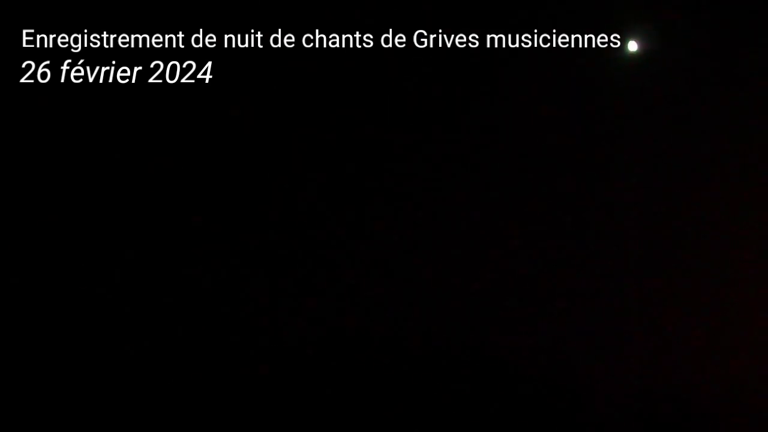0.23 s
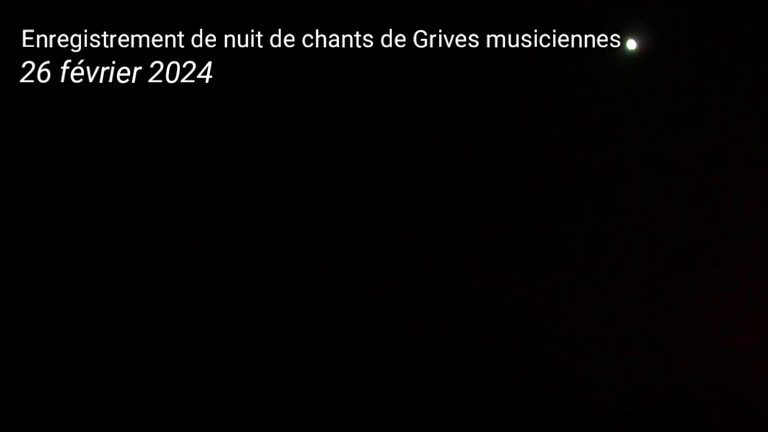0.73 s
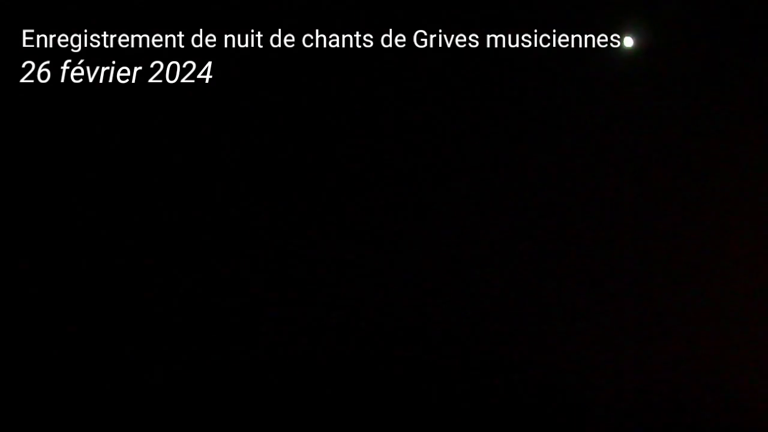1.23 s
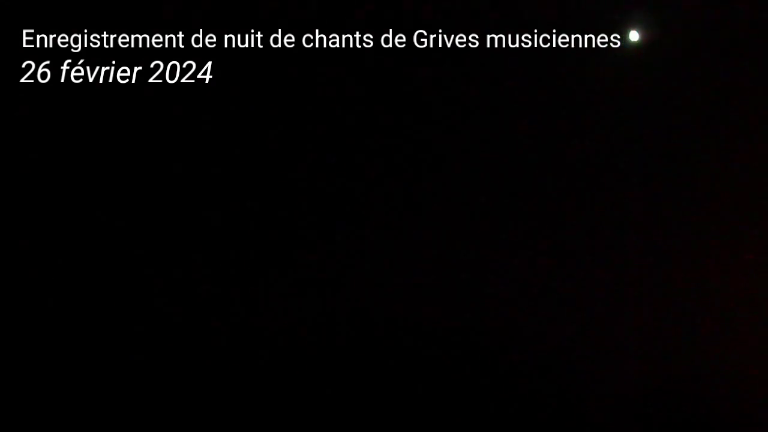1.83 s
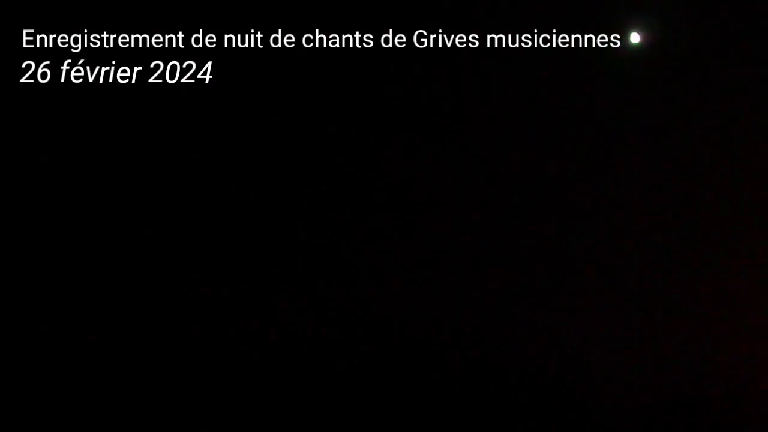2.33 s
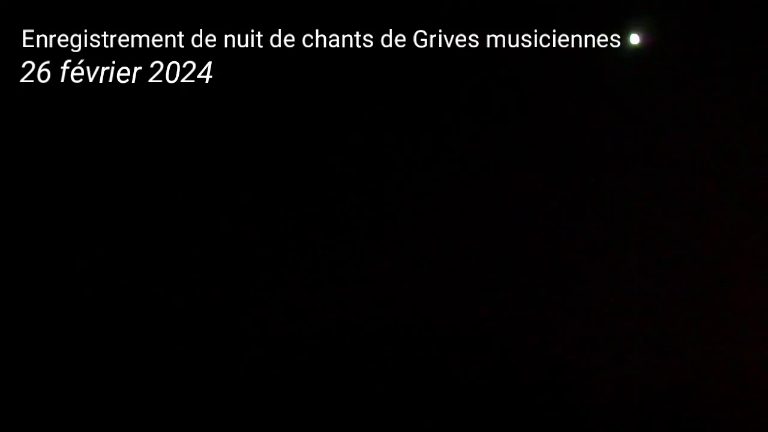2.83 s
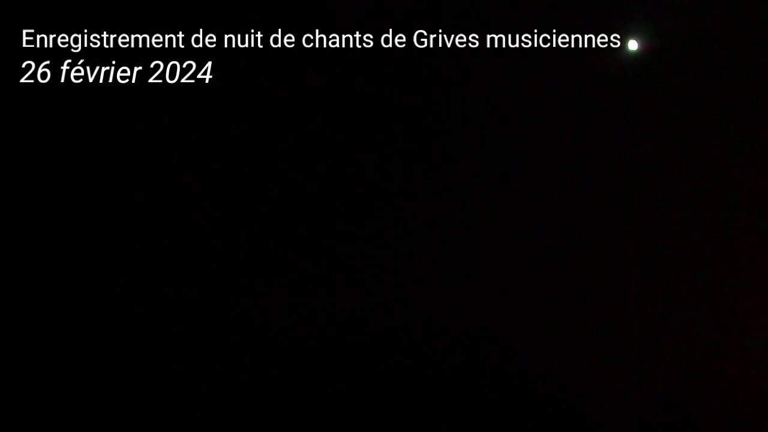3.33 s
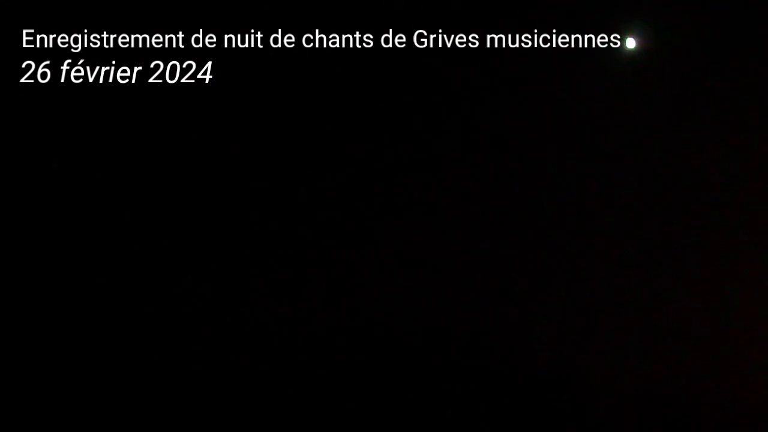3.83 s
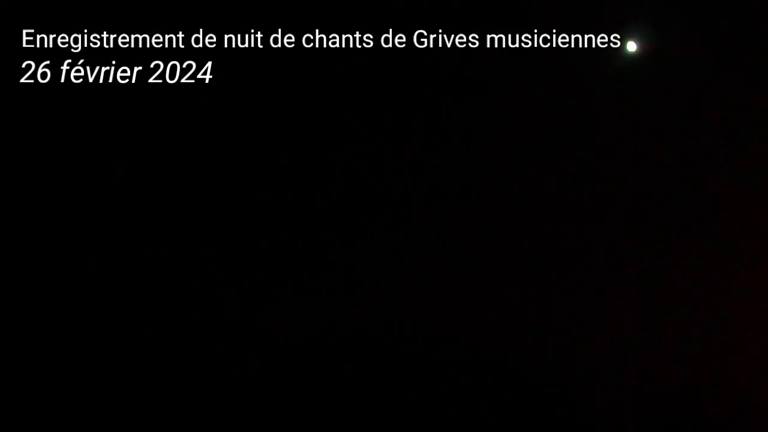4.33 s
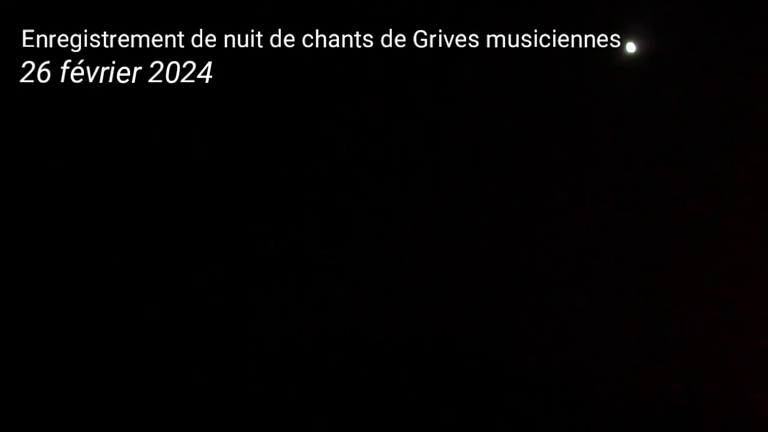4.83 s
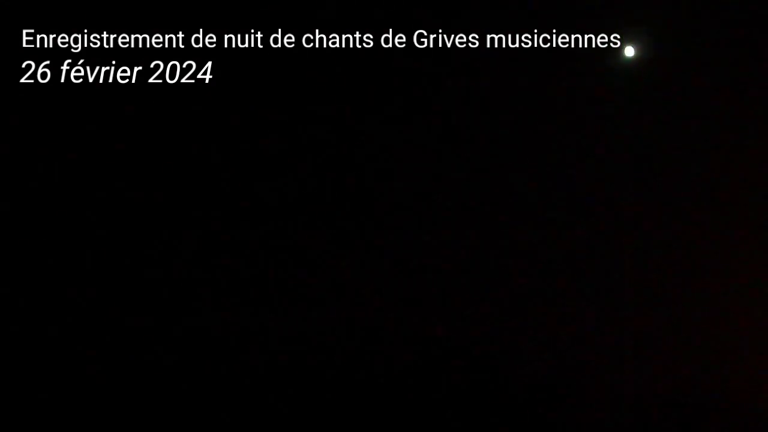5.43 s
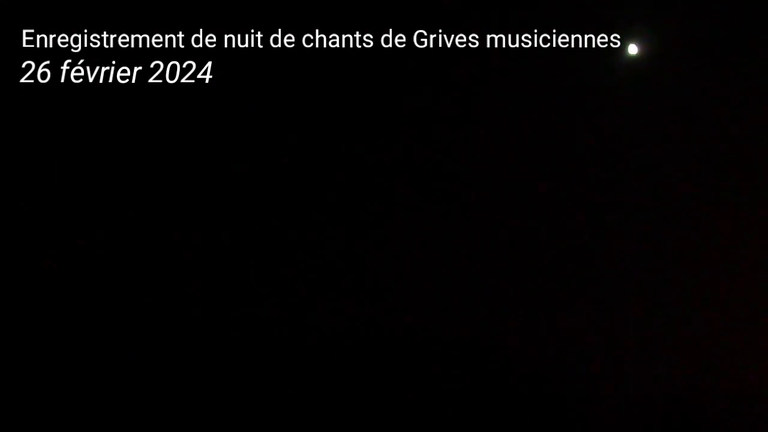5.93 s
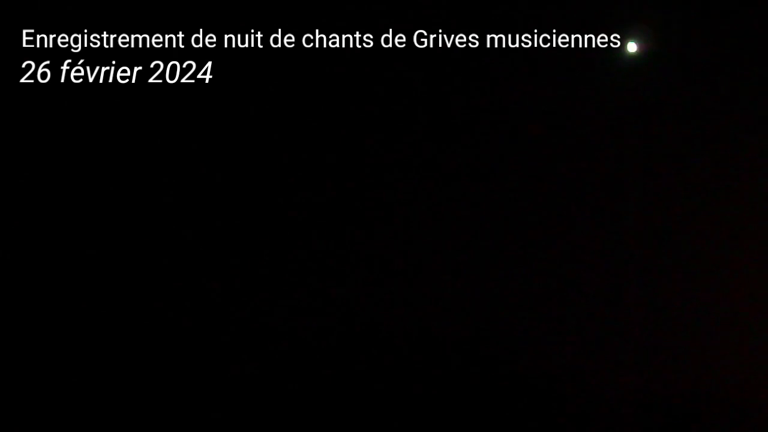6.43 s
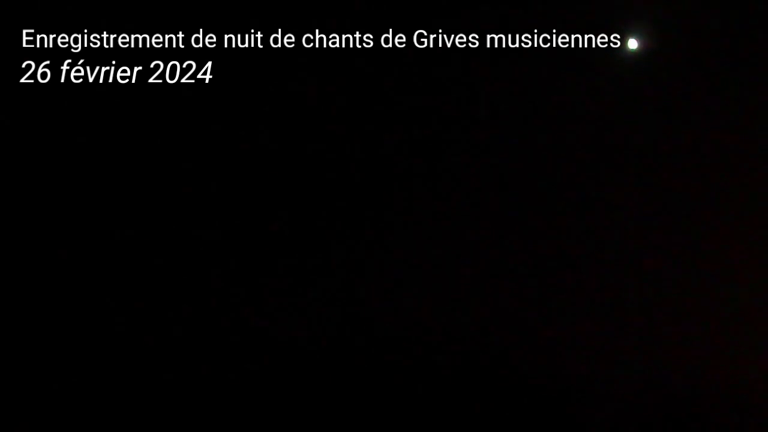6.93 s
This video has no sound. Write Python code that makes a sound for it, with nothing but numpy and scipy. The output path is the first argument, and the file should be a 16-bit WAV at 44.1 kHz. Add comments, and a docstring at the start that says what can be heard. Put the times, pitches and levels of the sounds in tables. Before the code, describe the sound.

A thrush repeats a short fluted phrase in the night while others twitter and chirp, with one close snap and a faint steady whine.

```python
"""A song thrush's fluted phrase at night, some way off, over a far murmur, mains hum and a thin whine.
The phrase comes back while other thrushes warble, trill, twitter and chirp, each note a whistled tone
from the syrinx; trees and walls echo them and the faint birds farther out. Once, close to the
microphone, something snaps. Heard in mono on a small recorder that cuts the highest treble."""
import sys
import numpy as np
from scipy import signal
from scipy.fft import rfft, irfft
from scipy.io import wavfile
from scipy.ndimage import uniform_filter1d

SR = 44100
rng = np.random.default_rng(int(sys.argv[2]) if len(sys.argv) > 2 else 0)


def master_out(mix):
    """Clip the mix to full scale and print it as 16-bit PCM to the path in sys.argv[1]."""
    frames = np.transpose(np.atleast_2d(mix))
    ceiling = np.clip(frames, -1, 1)
    pcm = np.round(ceiling * 32767).astype(np.int16)
    wavfile.write(sys.argv[1], SR, pcm)


N = 316638
RASP_HZ = 58  # how far quick notes stray from their pitch


def undb(db):
    """Decibels to gain."""
    return 10 ** (np.asarray(db) / 20)


def decay(t, t60_s):
    """An envelope that falls 60 dB in t60_s."""
    return np.exp(-np.log(1000) * t / t60_s)


def whistle(out, start_s, hz, db, waver_hz, overtone_db=-40, flutter_db=4.0, fade_ms=1.9):
    """One slightly unsteady tone from the syrinx, with two overtones; longer notes fade more gently."""
    k = np.arange(len(hz))
    fade_samples = fade_ms * SR / 1000 + .05 * min(len(k), SR // 10)
    fade = np.clip(np.minimum(k, k[::-1]) / fade_samples, 0, 1)
    waver, flutter = [np.interp(k, np.arange(80) * SR / 200, v) for v in rng.standard_normal((2, 80))]
    phase = 2 * np.pi * np.cumsum(hz + waver_hz * waver) / SR
    tone = np.sin(phase) + undb(overtone_db) * np.sin(2 * phase)
    tone += undb(1.35 * overtone_db) * np.sin(3 * phase)
    note = np.sqrt(2) * undb(db + flutter_db * flutter) * fade * tone
    first = max(int(start_s * SR), 0)
    out[first:first + len(note)] += note[:N - first]


def glide(out, strand, start_s=0, stretch=1, db=0, overtones_db=(-40, -40), ratio=1,
          round_ms=7.7, waver_hz=28.0):
    """A whistle along points of time_s, pitch_hz, level_db; the syrinx rounds the corners."""
    times, hz, levels = np.transpose(strand)
    t = np.arange(times[0], times[-1], 1 / SR / stretch)
    pitch = ratio * uniform_filter1d(np.interp(t, times, hz), int(round_ms * SR / 1000), mode="nearest")
    level = db + np.interp(t, times, levels)
    whistle(out, start_s + times[0] * stretch, pitch, level, waver_hz, np.linspace(*overtones_db, len(t)))


def chirp(out, start_s, ms, first_hz, last_hz, db, fade_db=0, least_rasp_hz=0):
    """A straight, slightly raspy sweep; notes longer than 25 ms hold their pitch better."""
    along = np.linspace(0, 1, int(ms * SR / 1000))
    rasp_hz = max(least_rasp_hz, RASP_HZ * min(1, 25 / ms))
    whistle(out, start_s, first_hz + (last_hz - first_hz) * along, db + fade_db * along, rasp_hz)


def swung_note(out, start_s, ms, first_hz, last_hz, swing_hz, rate_hz, db, power, spike_db, swell_db=0):
    """A whistle whose pitch spikes up quickly and sinks back, loudest near the resting pitch."""
    t = np.arange(0, ms / 1000, 1 / SR)
    saw = (1 + signal.sawtooth(2 * np.pi * rate_hz * t + 1, width=.2)) / 2
    stroke = uniform_filter1d(2 * saw ** power - .5, size=SR // 1000)
    pitch = np.linspace(first_hz, last_hz, len(t)) + swing_hz * stroke
    level = db + spike_db * np.abs(stroke) - swell_db * (1 - t / t[-1])
    whistle(out, start_s, pitch, level, RASP_HZ)


def night_murmur():
    """Steady noise: the far murmur in the bass, microphone hiss in the treble."""
    # spectrum of the background: frequency_hz, density_db_per_hz
    spectrum = [(28, -71.5), (40, -75), (52, -68.5), (70, -80.5), (110, -81.5), (680, -84.5), (1400, -94),
                (2600, -95), (6500, -99), (9000, -93.5), (11200, -86), (15600, -110)]
    hz, db = np.transpose(spectrum)
    log_hz = np.log(np.arange(N // 2 + 1) * SR / N + 1)
    gain = undb(np.interp(log_hz, np.log(hz), db)) * np.sqrt(SR / 2)
    return irfft(rfft(rng.standard_normal(N)) * gain, N)


def electrics(whine_hz=9560.2, flips_per_s=72.422, whine_db=-41.5, hum_hz=50, hum_db=-51.5):
    """A thin high tone whose sign flips at a steady rate, and mains hum."""
    t = np.arange(N) / SR
    sign = signal.square(np.pi * flips_per_s * (t - .011))
    whine = undb(whine_db) * sign * np.sin(2 * np.pi * whine_hz * t)
    # the circuit passes only a band, which softens the click of each flip
    whine = signal.sosfilt(signal.butter(1, [6500, 12500], "bandpass", fs=SR, output="sos"), whine)
    hum = undb(hum_db) * np.sin(2 * np.pi * hum_hz * t)
    return np.sqrt(2) * (whine + hum)


def chirps(out):
    """Straight sweeps and held whistles scattered through the song."""
    # single notes: start_s, length_ms, first_hz, last_hz, level_db
    notes = [(0.002, 43, 6770, 5200, -54.5), (0.045, 44, 6120, 7260, -51), (0.082, 45, 6700, 5800, -46.5),
             (0.688, 28, 3900, 4650, -51), (0.692, 20, 4270, 5330, -53), (0.716, 13, 3150, 5050, -42.5),
             (0.733, 13, 5200, 2790, -39.5), (0.748, 30, 3610, 2770, -42), (2.137, 28, 4180, 4000, -27),
             (2.237, 12.4, 5110, 3320, -35.5), (2.247, 4.6, 3300, 4100, -36), (2.265, 6.7, 3930, 4800, -37),
             (2.298, 16.4, 4560, 3670, -38), (2.328, 16, 4500, 3300, -46), (2.919, 12, 3750, 3820, -50),
             (2.941, 31.6, 3920, 4370, -34.5), (3.201, 7.2, 4800, 3820, -35), (3.435, 35, 4280, 4080, -43),
             (3.525, 19, 4076, 4340, -39), (3.62, 12.2, 3550, 3800, -33.5),
             (3.697, 27.5, 3750, 4254, -40.5), (3.763, 11, 3960, 3380, -43.5),
             (4.306, 52, 3254, 3730, -36.5), (4.348, 86, 2762, 2624, -36), (4.524, 18, 4160, 3400, -35),
             (4.558, 12, 3766, 3280, -28), (4.574, 53, 4580, 3240, -42), (4.62, 21, 4930, 3140, -34.5),
             (4.798, 91, 2703, 2750, -34), (4.892, 11.7, 3170, 2550, -32.5), (5.728, 21, 3240, 4080, -43.5),
             (6.982, 12.5, 6410, 5150, -55)]
    for note in notes:
        chirp(out, *note)


def echoes(song, low_t60_s=.97, high_t60_s=.35, near_t60_s=.088, high_db=5, near_db=-5.5, far_db=-7):
    """Quick scatter from near branches, then a long tail off trees and walls that loses treble first."""
    t = np.arange(int(1.5 * SR)) / SR
    far_noise, near_noise = rng.standard_normal((2, len(t)))
    low = signal.sosfilt(signal.butter(2, 4000, fs=SR, output="sos"), far_noise)
    high = undb(high_db) * (far_noise - low)
    tail = (low * decay(t, low_t60_s) + high * decay(t, high_t60_s)) * (1 - np.exp(-t / .0086))
    scatter = near_noise * decay(t, near_t60_s) * (1 - np.exp(-t / .00049))
    # energy of a decaying noise is t60 SR / (2 ln 1000)
    scale = np.sqrt(2 * np.log(1000) / SR)
    response = scale * (undb(far_db) * tail + undb(near_db) * scatter / np.sqrt(near_t60_s))
    return signal.fftconvolve(song, response)[:N]


def fluted_phrase(out):
    """One thrush repeats a phrase of three overlapping whistled strands from two voices, with three faint
    strands at the sum and difference pitches where those voices meet."""
    # the phrase, one list a strand: time_s, pitch_hz, level_db
    strands = [
        [(0, 1970, -51), (.025, 2350, -38), (.05, 2450, -32)],
        [(.022, 2820, -35.5), (.035, 3300, -42.5), (.05, 3000, -35.5), (.085, 2950, -32), (.105, 2950, -32),
         (.13, 2950, -38.5)],
        [(.106, 2370, -38.5), (.14, 2440, -32.5), (.185, 2431, -30), (.23, 2670, -30), (.27, 2840, -30.5),
         (.3, 3204, -30), (.33, 3600, -30.5), (.345, 4220, -50)],
        [(.022, 5100, -44), (.036, 5700, -48.5), (.05, 5550, -47)],
        [(.106, 5500, -50), (.185, 5200, -53)],
        [(.104, 3520, -39), (.118, 3750, -47.5), (.17, 3140, -46)],
    ]
    # each strand's second harmonic against its fundamental: start_db, end_db
    overtones = [(-7, -23), (-35, -38), (-43, -31), (-40, -40), (-40, -40), (-40, -40)]
    # how far each strand strays from its pitch: waver_hz
    wavers = [28, 10, 21, 80, 68, 100]
    # each time it is sung: start_s, stretch, gain_db
    repeats = [(.15, 1, -.5), (3.8, .985, .5), (4.46, .962, 0), (5.285, 1, -1), (6.105, 1.01, -1.5)]
    for start_s, stretch, db in repeats:
        for strand, overtones_db, waver_hz in zip(strands, overtones, wavers):
            glide(out, strand, start_s, stretch, db, overtones_db, waver_hz=waver_hz)


def far_birds():
    """Faint whistles, smeared by distance, and high falling ticks."""
    # distant whistles: start_s, length_ms, first_hz, last_hz, level_db
    whistles = [(0.586, 38, 4140, 4090, -54), (1.25, 100, 6600, 6170, -56.5), (1.56, 50, 3980, 4130, -48),
                (1.688, 87, 4190, 4050, -47), (1.842, 92, 4200, 4040, -50.5), (2.039, 78, 3200, 3180, -59),
                (2.589, 71, 4030, 4010, -48.5), (2.774, 57, 4020, 3580, -48.5),
                (5.206, 20, 6940, 6860, -46), (5.235, 16, 7070, 6500, -48), (7.104, 68, 4400, 3840, -58.5)]
    # one far bird's ticks: start_s
    ticks = [5.04, 5.068, 5.188, 5.226, 5.266]
    out = np.zeros(N)
    for note in whistles:
        chirp(out, *note, least_rasp_hz=90)
    for start_s in ticks:
        chirp(out, start_s, ms=12, first_hz=6700, last_hz=4950, db=-46)
    return out


def chips(out, first_s=.937, gap_s=.0705, low_top_hz=3500, rasp_hz=200):
    """Faint two-voiced arches of pitch at an even pace, each closed by a low drop."""
    # the high voice of each chip: top_hz, lag_ms
    high_voices = [(5400, 4), (5900, -2), (4400, 5), (4700, 11), (4030, 13)]
    sag = np.abs(np.linspace(-.75, 1, SR // 30)) ** 1.5
    for k, (top_hz, lag_ms) in enumerate(high_voices):
        start_s = first_s + k * gap_s
        whistle(out, start_s, low_top_hz * (1 - .408 * sag), db=-54.5, waver_hz=rasp_hz)
        whistle(out, start_s + lag_ms / 1000, top_hz * (1 - .39 * sag), db=-58.5, waver_hz=rasp_hz)
        chirp(out, start_s + .024, ms=14, first_hz=2350, last_hz=1950, db=-58.5, least_rasp_hz=rasp_hz)


def slurs(out):
    """Bending whistles, each sung once."""
    # one list a slur: time_s, pitch_hz, level_db
    strands = [
        [(1.42, 5200, -49), (1.437, 6300, -36.5), (1.448, 5860, -33), (1.465, 6660, -33.5),
         (1.485, 6750, -26.5), (1.502, 5870, -35)],
        [(1.398, 3880, -53), (1.448, 4120, -47), (1.462, 4750, -39), (1.49, 4900, -60)],
        [(5.745, 2770, -29), (5.757, 3070, -31), (5.79, 2235, -40.5), (5.805, 2147, -46), (5.83, 2630, -31.5),
         (5.855, 2550, -24.5)],
    ]
    for strand in strands:
        glide(out, strand)


def warbles(out):
    """A high two-voiced warble, three times in quick succession."""
    # the warble, one list a voice: time_s, pitch_hz, level_db
    voices = [
        [(0, 4930, -33), (.016, 7240, -31), (.034, 5760, -32.5), (.05, 5220, -41), (.066, 6480, -26),
         (.091, 5750, -30.5)],
        [(.018, 7400, -49), (.031, 8250, -42), (.051, 7000, -26.5), (.072, 8530, -38), (.1, 6650, -25),
         (.112, 7680, -28.5)],
    ]
    # each time it is sung: start_s, stretch, pitch_ratio, gain_db
    repeats = [(1.578, 0.99, 0.97, 0.5), (1.752, 0.98, 0.97, 0), (1.956, .99, 1.01, -2)]
    for start_s, stretch, ratio, db in repeats:
        for voice in voices:
            glide(out, voice, start_s, stretch, db, ratio=ratio, round_ms=5.3)


def trills(out, swing_hz=380):
    """Swelling notes with spiky swings of pitch, each closed by a thin falling squeak."""
    # trilled notes: start_s, length_ms, first_hz, last_hz, swings_per_s, level_db
    notes = [(2.161, 43, 4330, 4064, 58, -27.5), (4.068, 74, 4200, 4480, 60, -25.5),
             (4.179, 50, 4300, 4210, 76, -21.5), (4.295, 46, 4260, 4390, 55, -27),
             (4.4, 56, 4240, 4270, 74, -26.5)]
    for start_s, ms, first_hz, last_hz, rate_hz, db in notes:
        swung_note(out, start_s, ms, first_hz, last_hz, swing_hz, rate_hz, db,
                   power=3.2, spike_db=-5, swell_db=4)
        squeak_s = start_s + (ms - 6) / 1000
        chirp(out, squeak_s, ms=12, first_hz=7500, last_hz=5300, db=db - 29)


def tick_runs(out, slowing_ms=1.8, shrink=.75, step_db=-1.77):
    """Runs of rising ticks that slow, shrink and fade; each tick thins out towards its top."""
    # runs: start_s, tick_count, gap_ms, low_hz, first_top_hz, level_db
    runs = [(2.215, 6, 60, 3050, 4800, -28), (5.0, 5, 67.5, 2750, 3100, -35.5)]
    for start_s, count, gap_ms, low_hz, first_top_hz, db in runs:
        for k in range(round(count)):
            tick_s = start_s + k * (gap_ms + slowing_ms * k / 2) / 1000
            top_hz = low_hz + (first_top_hz - low_hz) * shrink ** k
            chirp(out, tick_s, ms=10, first_hz=low_hz, last_hz=top_hz, db=db + step_db * k, fade_db=-5)


def twitters(out):
    """A repeated syllable: a rising lead-in turns over into three quick strands."""
    # the syllable, one list a strand: time_from_turn_s, pitch_hz, level_db
    strands = [
        [(0, 4305, -20), (.012, 3505, -30.5), (.025, 2910, -55), (.045, 2630, -46)],
        [(.008, 6800, -51), (.022, 5540, -53), (.032, 5650, -52), (.042, 5170, -45)],
        [(.017, 4200, -32.5), (.038, 4430, -37), (.043, 4920, -39.5), (.052, 3480, -20)],
    ]
    # each time it is sung: turn_s, lead_ms, stretch, pitch_ratio, gain_db
    repeats = [(2.985, 14.3, 0.62, 0.98, -4.5), (3.091, 23, 0.92, 1, -1.5), (3.215, 8.3, 0.74, 1.03, -2.5),
               (3.299, 3.8, 1.1, 1.033, -3.5), (3.422, 15.5, .9, .99, -10)]
    turn_hz = strands[0][0][1]
    for turn_s, lead_ms, stretch, ratio, db in repeats:
        chirp(out, turn_s - lead_ms / 1000, lead_ms, first_hz=3750, last_hz=ratio * turn_hz, db=db - 28)
        for strand in strands:
            glide(out, strand, turn_s, stretch, db, ratio=ratio, round_ms=1.6, waver_hz=RASP_HZ)


def pointed_ticks(out, flank_ms=9, foot_ratio=.76):
    """Ticks that sweep straight up and straight down again."""
    # the point of each tick: top_s, top_hz, level_db
    points = [(3.19, 4720, -37.5), (3.396, 5450, -45), (3.551, 4290, -36.5), (3.589, 4650, -41),
              (4.553, 4940, -33)]
    for top_s, top_hz, db in points:
        chirp(out, top_s - flank_ms / 1000, flank_ms, foot_ratio * top_hz, top_hz, db)
        chirp(out, top_s, flank_ms, top_hz, foot_ratio * top_hz, db)


def pips(out):
    """Soft, low rising notes under the twitter."""
    # pips: start_s, level_db
    notes = [(3.183, -44.5), (3.276, -45), (3.516, -48), (3.589, -46), (3.692, -43), (3.759, -46.5)]
    for start_s, db in notes:
        chirp(out, start_s, ms=14.4, first_hz=3050, last_hz=3440, db=db)


def snap(t60_s=.011):
    """A dry twig-like crack near the microphone: a few quick breaks, each a burst of noise."""
    # breaks: start_s, level_db
    breaks = [(3.238, -25), (3.245, -15), (3.2463, -21), (3.2478, -24)]
    t = np.arange(SR // 20) / SR
    out = np.zeros(N)
    for start_s, db in breaks:
        out[int(start_s * SR):][:len(t)] += undb(db) * rng.standard_normal(len(t)) * decay(t, t60_s)
    band = signal.butter(3, [1000, 6500], "bandpass", fs=SR, output="sos")
    top_cut = signal.butter(4, 7800, fs=SR, output="sos")
    return signal.sosfilt(np.vstack([band, top_cut]), out)


def buzzes(out, rate_hz=140, flick_ms=8):
    """Fast, even swings of pitch at nearly even strength, each note reached by an upward flick."""
    # buzzed notes: start_s, length_ms, flick_from_hz, first_hz, last_hz, swing_hz, level_db
    notes = [(4.304, 23, 4570, 5330, 5190, 300, -37), (4.415, 21.9, 4595, 5390, 4610, 300.5, -36),
             (5.93, 25, 2330, 3220, 3090, 96.2, -30), (6.007, 29, 3000, 4160, 3940, 111, -36.5),
             (6.079, 41, 4250, 4960, 4430, 290, -38), (6.175, 19.4, 5160, 5500, 4550, 303, -36.5),
             (6.703, 26.8, 4080, 4450, 4020, 590, -42.5), (6.79, 31, 3340, 6400, 4030, 466, -45.5),
             (6.882, 38, 2980, 6550, 3960, 450, -45.5), (6.955, 28, 3200, 6750, 6640, 300, -48)]
    for start_s, ms, flick_from_hz, first_hz, last_hz, swing_hz, db in notes:
        chirp(out, start_s - flick_ms / 1000, flick_ms, flick_from_hz, first_hz, db=-48)
        swung_note(out, start_s, ms, first_hz, last_hz, swing_hz, rate_hz, db, power=1.3, spike_db=-1)


def scene():
    """At the microphone: birds and their echoes, the snap, the murmur and the electrics."""
    song = np.zeros(N)
    for sing in (chirps, fluted_phrase, chips, slurs, warbles, trills, tick_runs, twitters,
                 pointed_ticks, pips, buzzes):
        sing(song)
    far = far_birds()
    direct = song + undb(-11) * far  # far birds come mostly by way of echoes
    return (direct + echoes(song + far) + snap() + night_murmur() + electrics())[None]


def record(dry, top_hz=15450):
    """The small recorder cuts the top steeply."""
    return signal.sosfilt(signal.ellip(10, .2, 80, top_hz, fs=SR, output="sos"), dry)


dry = scene()
out = record(dry)
master_out(out)
```